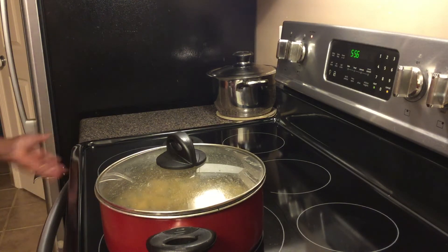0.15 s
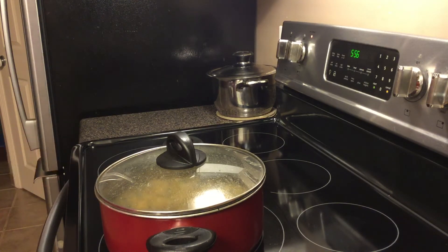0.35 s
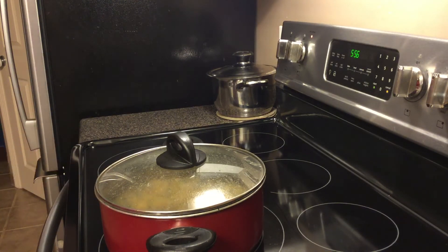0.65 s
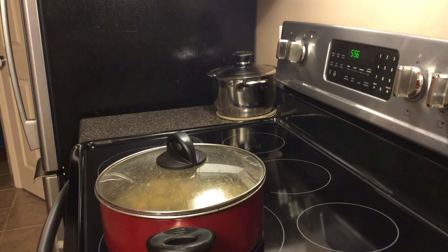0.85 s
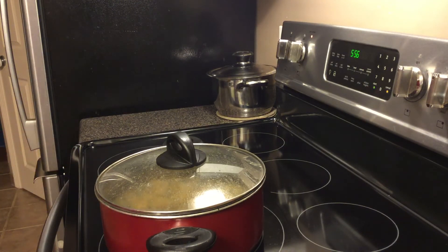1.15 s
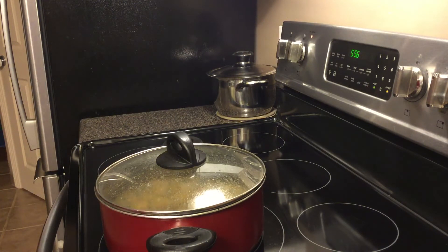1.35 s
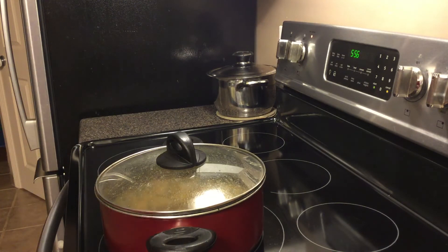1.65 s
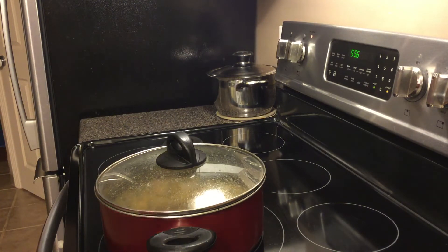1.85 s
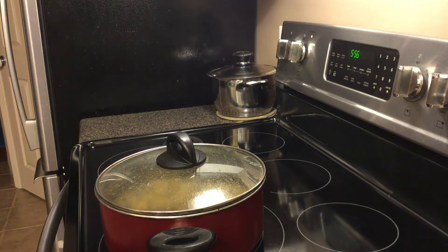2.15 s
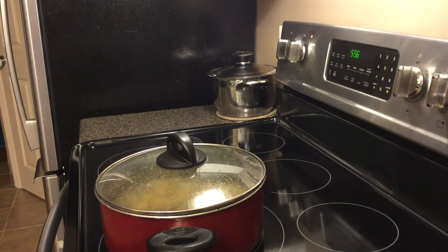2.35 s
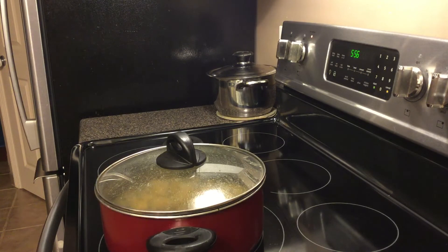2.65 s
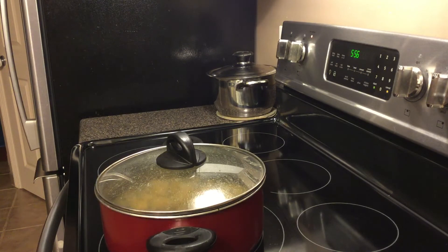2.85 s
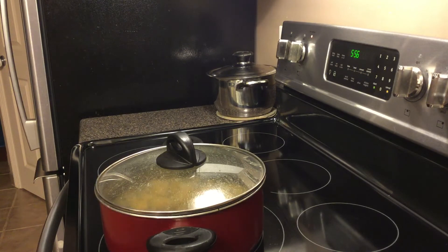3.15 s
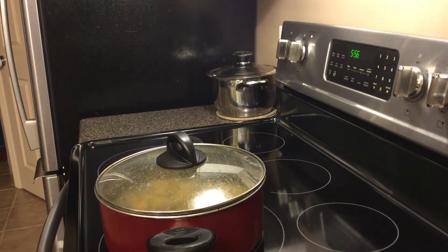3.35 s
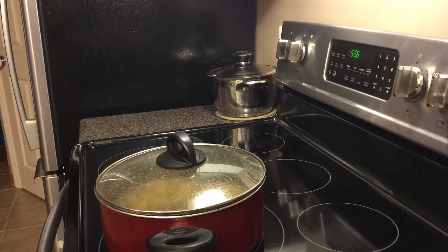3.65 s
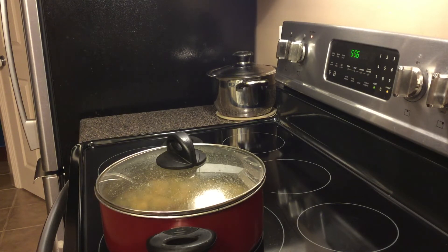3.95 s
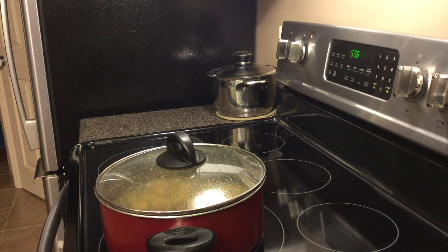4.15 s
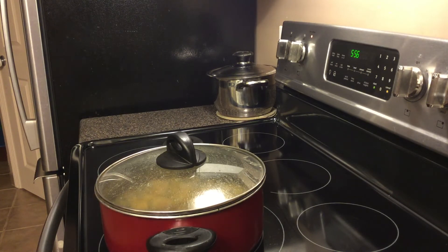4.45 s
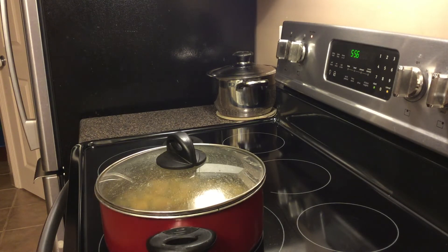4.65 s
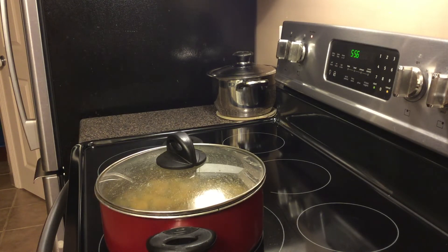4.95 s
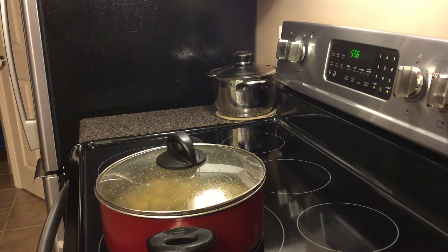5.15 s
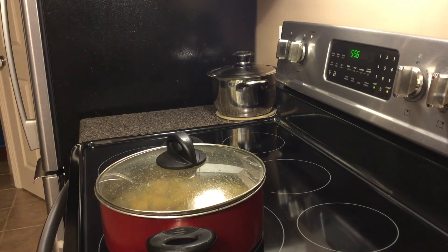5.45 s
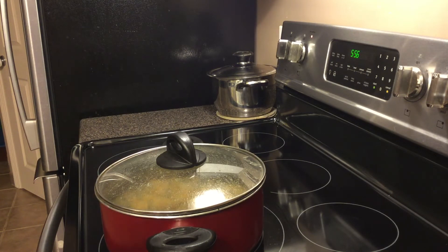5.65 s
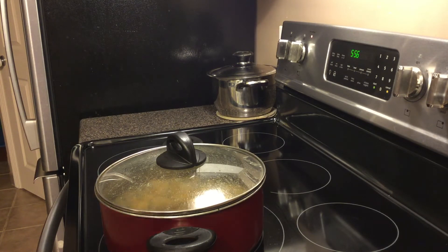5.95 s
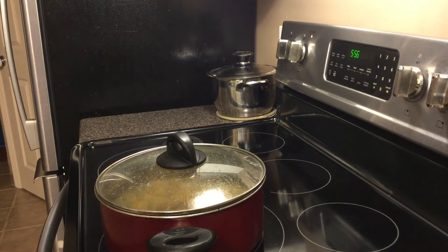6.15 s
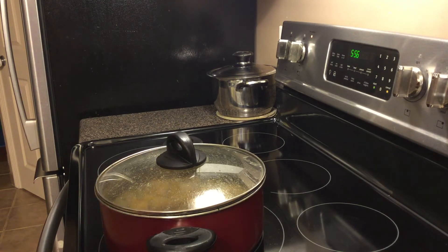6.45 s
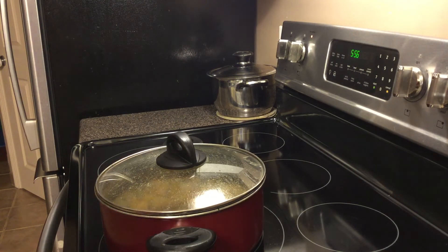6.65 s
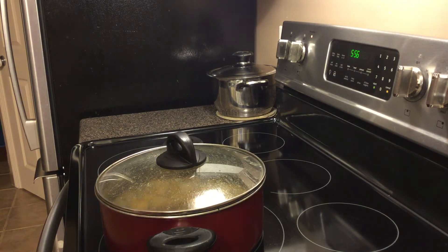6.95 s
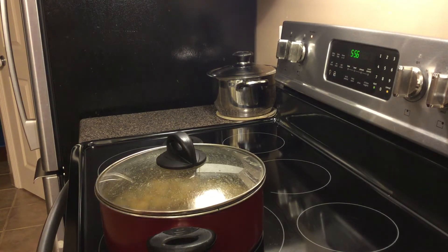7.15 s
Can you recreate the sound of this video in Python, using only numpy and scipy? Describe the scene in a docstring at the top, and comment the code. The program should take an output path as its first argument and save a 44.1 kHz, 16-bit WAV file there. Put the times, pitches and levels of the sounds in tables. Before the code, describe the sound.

In a small, hard-walled home kitchen, a lidded pot simmers with a low, lumpy drone and faint metallic pings. Metal rings weakly at first and soft steps thump the floor. Away from the pot, a drawer or cupboard slams loudly with a utensil rattle, then a duller knock, small bumps, a bright clack and light taps follow. One stationary microphone picks up low rumble and slight hiss.

```python
"""A quiet home kitchen: filtered noise makes a simmering pot's low lumpy drone, house rumble and room tone.
At the start metal rings faintly as wavering sines; soft footfalls, heard as damped sines, thump the floor.
Bubbles ping the pot wall as decaying sine pairs, among faint rubbing strokes and tiny noise ticks.
From about 2.5 s a drawer or cupboard clacks, slams and is knocked: spiky rattles excite wood and metal.
A small hard-walled room answers knocks, thuds and the listed pings with a decaying noise echo."""
import sys
import numpy as np
from scipy import signal
from scipy.fft import rfft, irfft, next_fast_len
from scipy.io import wavfile
from scipy.ndimage import uniform_filter1d, map_coordinates

SR = 44100
rng = np.random.default_rng(int(sys.argv[2]) if len(sys.argv) > 2 else 0)


def transcribe(u):
    """Save the signal u as a 16-bit wav file named by the first command-line argument.

    u: samples, shape (n,) or (channels, n), limited to [-1, 1]; the rate is SR.
    q: integer samples, one column per channel.
    """
    v = np.clip(np.atleast_2d(u).T, -1, 1)
    q = np.round(v * 32767).astype(np.int16)
    wavfile.write(sys.argv[1], SR, q)


N = 322371

# Metal still ringing at the start: pitch_hz, level_db, t60_s
LINGERING_MODES = [(1190, -70, .5), (1500, -73, .8), (1880, -74, 1.5), (2370, -72.5, 2), (4010, -71.5, .5)]
# Slow level changes of the steady sources: time_s, simmer_level_db, house_rumble_level_db
STEADY_LEVELS = [(0.0, -52, -63), (0.41, -56.5, -60), (0.81, -52, -63), (1.16, -55.5, -56),
                 (1.46, -56, -63.5), (1.73, -55, -64.5), (2.38, -56, -61), (2.69, -55, -61),
                 (2.87, -53.5, -54.5), (4.07, -55.5, -64), (4.95, -54.5, -54.5), (5.23, -54.5, -59.5),
                 (5.9, -52.5, -62), (6.4, -54.5, -59), (6.84, -55, -61.5), (7.31, -52, -67)]
# Relative spectrum of the building's rumble: frequency_hz, density_db_per_hz
RUMBLE_SPECTRUM = [(13, -55), (22, -38), (27, -34), (29, -38), (35, -60), (45, 11.5), (130, 2.5),
                   (170, -73), (290, -120)]
# Relative spectrum of room tone and microphone hiss: frequency_hz, density_db_per_hz
AIR_SPECTRUM = [(180, -43), (300, -4.5), (326, -15), (360, 2), (405, -18), (478, -2), (565, -14),
                (614, -11.5), (946, -16), (1150, -16), (2320, -26.5), (7320, -30.5), (9240, -27),
                (14200, -31.5), (16000, -47)]
# Relative spectrum of the simmering pot: frequency_hz, density_db_per_hz
SIMMER_SPECTRUM = [(65, -24.5), (110, -10), (140, -14), (161, -9.5), (188, -1.5), (232, -12.5),
                   (268, -14.5), (323, -27.5), (361, -32), (420, -26.5), (550, -61), (920, -120)]
# Modes of the pot wall: pitch_hz, relative_level_db (the level serves the small pings only)
POT_MODES = [(1170, 10), (1720, 5), (2110, 0), (2385, -1), (2840, 0), (3380, -3), (4000, -5)]
# Loudest pings of the pot wall: start_s, level_db, mode_index (from 0)
PINGS = [(.245, -68.5, 4), (.46, -71, 1), (.51, -63, 1), (.57, -73, 1), (.649, -66, 1), (.862, -72, 1),
         (1.02, -72, 2), (1.083, -73, 5), (1.285, -71, 4), (1.36, -66, 4), (1.485, -69, 4),
         (2.047, -60.5, 4), (3.533, -69, 2), (3.947, -65.5, 6), (4.25, -70, 1), (4.545, -69, 1),
         (4.585, -70, 1), (5.62, -61, 0), (5.708, -71, 4), (5.715, -61, 0), (5.797, -70, 3),
         (5.798, -62, 0), (5.885, -65, 0), (5.912, -71, 2), (5.972, -57, 0), (6.03, -71, 4),
         (6.033, -71, 5), (6.037, -70, 2), (6.314, -61, 1)]
# Low thuds through furniture and floor: start_s, level_db, pitch_hz, t60_s
THUDS = [(0, -38, 66, 0.37), (0.036, -37, 86, 0.14), (1.002, -40, 51.4, 0.29), (1.041, -36, 65, 0.1),
         (1.2, -45, 54.6, 0.53), (2.456, -28, 179, 0.063), (2.519, -23.5, 227.2, 0.2),
         (2.52, -17, 150.4, 0.12), (2.527, -17.5, 83.5, 0.089), (2.562, -28, 190.5, 0.11),
         (2.563, -24, 103.5, 0.1), (2.598, -30, 87, 0.062), (2.806, -37, 115, 0.067),
         (2.857, -40, 86, 0.19), (2.97, -53, 95.3, 0.078), (3.267, -25.5, 74, 0.11),
         (3.2799, -21, 84.5, 0.071), (3.282, -32.5, 140, 0.13), (3.3, -35.5, 123, 0.13),
         (3.355, -41.5, 99, .12), (4.214, -35.5, 100, 0.2), (4.453, -40.5, 180, 0.15),
         (4.741, -37.5, 101.6, 0.34), (4.77, -34.5, 92.3, 0.23), (4.95, -37, 231.4, 0.079),
         (5.138, -36, 290.5, 0.31), (5.144, -40, 515, 0.12), (5.543, -39, 171, 0.2), (5.58, -35.5, 96, 0.1),
         (5.741, -37.5, 108, 0.075), (6.157, -46, 379, 0.12)]
# Rubbing strokes, at full level from start_s: start_s, held_s, level_db
STROKES = [(0, 0.012, -56), (.1, 0.12, -71), (2.3, 0.1, -67.5), (5.26, 0.024, -66), (5.82, 0.11, -72.5),
           (6.65, 0.027, -71)]
# Relative spectrum of rubbing: frequency_hz, density_db_per_hz
RUBBING_SPECTRUM = [(180, -37), (300, 3), (500, -4), (900, -8), (2400, -13), (4000, -22.5), (9000, -47),
                    (14000, -83)]
# Tiny bright ticks: start_s, level_db (rms before decay)
TICKS = [(0.087, -73), (.388, -70.5), (0.857, -74), (4.96, -65.5), (7.168, -63)]
# Relative spectrum of a tick: frequency_hz, density_db_per_hz
TICK_SPECTRUM = [(5000, -48), (7000, -7), (8200, -18), (9600, -12), (11500, -18), (13500, -12),
                 (15500, -49)]
# Hard contacts: start_s, level_db, wood_db (re dense body), ring_db (re direct rattle), room_db (re rattle),
# steel_db (utensil modes re body), ring_hz, rattle_t60_s, edge_hz (hardness as top of the metal edge)
KNOCKS = [(2.4528, -26.5, -1, 4, -7.5, -2, 1276, 0.04, 12900),
          (2.461, -28, -11, -11, -15, -6, 1970, 0.065, 7000),
          (2.5094, -27.5, -28, -3.5, -4.5, -16, 1376, 0.084, 14200),
          (2.5185, -34.5, 11.5, 7.5, -7, -5, 542, 0.13, 15100),
          (2.5215, -36, -13, 0, -10, 0, 2090, 0.068, 9000), (2.533, -50, 10, -4, 1, -3, 3050, 0.055, 7950),
          (2.5523, -43, 17, 6, -13, 3, 1820, 0.054, 9500), (2.566, -38, 10.5, 2, -10, 1, 710, 0.042, 5000),
          (2.594, -47, 6, 3, -7, -5, 530, 0.076, 4000), (3.107, -61, -10, 2, -6, 3, 1070, 0.053, 2340),
          (3.257, -53.5, -7, -5, -2, -12, 2050, 0.067, 13600),
          (3.265, -43, 0, -6, -10, -1, 1065, 0.1, 5300), (4.2017, -51, 17, 5, -13.5, 6, 1170, 0.062, 1950),
          (4.7342, -42.5, 7, -5, -7, -4, 2550, 0.043, 5400),
          (4.739, -47, -4.5, 0.5, -14, -5, 1115, 0.086, 4400),
          (4.765, -50.5, 8, 0, -11, 6, 1100, 0.044, 3900), (4.941, -62, 1, 12.5, -10, -8, 507, 0.17, 1750),
          (5.123, -57, -5, -3, -4, -6, 2530, 0.051, 4000),
          (5.1321, -27.5, -23, -9, -6, -3, 3180, 0.054, 5530),
          (5.141, -42.5, -17, -0.5, -13, -8, 908, 0.43, 5600),
          (5.139, -47.5, 7.5, 4.5, -8.5, 5, 523, 0.22, 3060),
          (5.152, -40, -5, 3.5, -19, -2, 2620, 0.066, 5500), (5.176, -48, -1, -6, -4, 2, 2120, 0.052, 6000),
          (5.2509, -65, -6, 4, -12, -1, 908, 0.54, 5070),
          (5.534, -59.5, 13.5, 4, -2, -20, 1270, 0.095, 5100),
          (5.551, -62, 13, -7, -7.5, -11, 2150, 0.096, 6000),
          (5.801, -76, 15, 12, -11, -5, 650, 0.16, 3800),
          (6.1566, -55.5, 13.5, 7, -6, 2, 1180, 0.071, 7800),
          (6.176, -58, 9, 7.5, -8, -11, 1525, 0.069, 4930), (6.243, -68, 7, 6, 0, -5, 1110, 0.076, 3500)]
# Modes of the drawer panels: pitch_hz, width_hz, level_db
PANEL_MODES = [(266, 60, 7), (429, 122, 2.5), (556, 75, 2.5), (700, 82, 2.5), (903, 57, -4),
               (1130, 29, 5.5), (1270, 850, -7.5)]
# Modes of the utensils before scatter and damping: pitch_hz, width_hz, level_db
UTENSIL_MODES = [(1524, 14, 9), (1900, 20, 6), (2116, 30, 8), (2300, 30, 3), (2660, 30, 6), (2880, 30, 5),
                 (3100, 30, 3), (3750, 70, 4), (4210, 90, -3), (4990, 110, 2), (5800, 150, 0),
                 (8400, 700, 5), (10680, 250, 1), (11940, 300, -4)]
# Decay of the kitchen's echo: frequency_hz, t60_s
KITCHEN_DECAY = [(80, 0.35), (300, 0.43), (1500, 0.48), (5000, 0.4), (9000, 0.35), (14000, 0.34)]

TOP_HZ = 15750  # band limit
SWELL_S, DAMPED_S = .05, .2  # time constant of the lingering ring's rise; time its damping starts
AIR_DB = -68.5
PING_T60_S, PING_ROOM_DB = 0.12, -12
SLIDE_RISE_DB_PER_S, SLIDE_FALL_DB_PER_S = 359, 167
HARDEST_HZ, BODY_TOP_HZ, BODY_KNEE_HZ = 14000, 4070, 5340  # a softer contact also dulls the body
EDGE_DB, EDGE_DB_PER_OCTAVE = -6.5, 5  # edge at HARDEST_HZ; loss for each octave softer
HARD_ATTACK_S = 0.00079  # rise time constant at HARDEST_HZ, longer when softer
RING_LIFE, RING_ROOM_DB = 0.48, -10.5  # ring t60 over rattle t60; the room's answer to the ring
LEAD_DB, LEAD_DB_PER_S = -23.5, 1500  # a faint scrape swells into each contact
BODY_BOTTOM = 0.28  # low edge of the body over the ring pitch
GRIP = 0.89  # loose pieces damp each other: added mode width times rattle t60
SPILL_DB = -19  # faint treble that even a soft contact keeps
PATCH_DB = 2  # depth of the uneven patches in the room's answer


def amp(db):
    """Decibel law: gain of a level in dB."""
    return 10 ** (np.asarray(db) / 20)


def unit(x):
    """Power normalization: x at rms 1."""
    return x / np.sqrt(np.mean(x ** 2) + 1e-20)


def along(points, hz):
    """Interpolation of (Hz, value) points on a logarithmic frequency axis."""
    f, v = np.transpose(points)
    return np.interp(np.log(hz + 1), np.log(f + 1), v)


def curve(rows, axis=1):
    """Linear interpolation of a level column at each sample; -120 dB outside the rows."""
    rows = np.asarray(rows)
    return np.interp(np.arange(N) / SR, rows[:, 0], rows[:, axis], left=-120, right=-120)


def wobble(rate):
    """Random modulation: a smooth curve through rate knots a second, at most 60."""
    knots = rng.standard_normal(int(N * 60 / SR) + 4)
    return map_coordinates(knots, [np.arange(N) * min(rate, 60) / SR])


def filtered(x, response):
    """Linear filtering: the spectrum of x times a complex response of frequency."""
    m = next_fast_len(x.shape[-1] + SR // 2)
    return irfft(rfft(x, m) * response(np.fft.rfftfreq(m, 1 / SR)), m)[..., :x.shape[-1]]


def noise(spectrum, size=N):
    """Spectral shaping: white noise given a colour and rms 1."""
    return unit(filtered(rng.standard_normal(size), lambda hz: amp(along(spectrum, hz))))


def resonances(modes):
    """Modal superposition: causal response of (Hz, width, dB) modes with alternating signs."""
    def response(f):
        total = 0
        for k, (center, width, db) in enumerate(modes):
            damping = 1j * f * width
            total = total + (-1) ** k * amp(db) * damping / (center * center - f * f + damping)
        return total
    return response


def below(top_hz):
    """Low-pass law of contact: a causal steep filter, since a softer contact has less treble."""
    return lambda f: signal.freqs(*signal.butter(7, 1, analog=True), f / top_hz)[1]


def above(f, hz):
    """Second-order causal high-pass response."""
    return (1j * f / (1j * f + hz)) ** 2


def even(response):
    """Power normalization of a sampled response over frequency."""
    return response / np.sqrt(np.mean(np.abs(response) ** 2))


def add(track, s, x):
    """Superposition: mix x into track from s seconds on."""
    part = track[round(s * SR):][:len(x)]
    part += x[:len(part)]


def echo():
    """Reverberation: a fresh noise tail of energy 1, each frequency dying at its own speed."""
    hz, t, z = signal.stft(rng.standard_normal(SR // 2), SR, nperseg=256)
    patches = uniform_filter1d(rng.standard_normal(z.shape), size=3, axis=0)
    patches = unit(uniform_filter1d(patches, size=6, axis=1))
    decay_db = -60 * t / along(KITCHEN_DECAY, hz)[:, None]
    tail = signal.istft(z * amp(PATCH_DB * patches + decay_db), SR, nperseg=256)[1][:SR // 2]
    # The walls answer one after another, so the tail builds up.
    tail = tail * (1 - np.exp(-(np.arange(SR // 2) / SR / 0.012) ** 2))
    return tail / np.linalg.norm(tail)


def linger():
    """Free modal decay: metal rings faintly, each mode wavering, until it is damped."""
    t = np.arange(N) / SR
    free = amp(-180 * np.maximum(t - DAMPED_S, 0)) * (1 - np.exp(-t / SWELL_S))
    out = np.zeros(N)
    for hz, db, t60 in LINGERING_MODES:
        level_db = db - 60 * t / t60 + 4.5 * wobble(25)
        phase = 2 * np.pi * hz * t + 1.6 * wobble(50)  # phase wander in radians
        out += amp(level_db) * np.sin(phase)
    return free * out


def house():
    """Stationary background noise: modulated low rumble of the building and nearly steady room tone."""
    rumble = amp(curve(STEADY_LEVELS, axis=2) + 0.55 * wobble(5.4)) * noise(RUMBLE_SPECTRUM)
    return rumble + amp(AIR_DB + 0.085 * wobble(4.5)) * noise(AIR_SPECTRUM)


def wall_ping(hz, t60):
    """Beating of a split wall mode: two close sines decay together after a soft rise."""
    t = np.arange(SR // 2) / SR
    twin_hz = hz * rng.normal(1, .02)
    pair = np.sin(2 * np.pi * hz * t) + .4 * np.sin(2 * np.pi * twin_hz * t)
    return pair * amp(-60 * t / t60) * (1 - np.exp(-t / .006))


def pot():
    """Bubble excitation: collapsing bubbles pulse the pot's low drone and tap its wall modes."""
    drone_db = curve(STEADY_LEVELS) + 1.8 * wobble(12) + .8 * wobble(4)
    out = amp(drone_db) * noise(SIMMER_SPECTRUM)
    for s, db, mode in PINGS:
        tap = amp(db) * wall_ping(POT_MODES[mode][0] * rng.normal(1, .006), PING_T60_S)
        add(out, s, tap + amp(PING_ROOM_DB) * signal.fftconvolve(tap, echo())[:len(tap)])
    # Many fainter pings fall at random times, without echo.
    for when, which, size, detune in rng.random((300, 4)):
        hz, db = POT_MODES[int(which * len(POT_MODES))]
        add(out, when * N / SR, amp(db - 84 + 6 * size) * wall_ping(hz * (.985 + .03 * detune), .1))
    return out


def thuds():
    """Damped oscillation: a soft heavy contact swings low, with a faster-dying partner above it."""
    out, t = np.zeros(N), np.arange(SR // 3) / SR
    for s, db, hz, t60 in THUDS:
        partner = 0.24 * np.sin(2 * np.pi * 1.673 * hz * t) * amp(-30 * t / t60)
        swing = np.sin(2 * np.pi * hz * t) + partner
        onset = 1 - np.exp(-(t * hz / 0.2) ** 2)  # sets in over a fraction of a cycle
        direct = amp(db - 60 * t / t60) * onset * swing
        add(out, s, direct)
        add(out, s, amp(-10.0) * signal.fftconvolve(direct, echo()))
    return out


def slides():
    """Friction noise: wood and metal rub grainily in strokes that swell, hold and die away."""
    t = np.arange(N) / SR
    strokes = np.zeros(N)
    for s, held, db in STROKES:
        rise_db = SLIDE_RISE_DB_PER_S * np.minimum(t - s, 0)
        fall_db = SLIDE_FALL_DB_PER_S * np.maximum(t - s - held, 0)
        strokes += amp(db + rise_db - fall_db)
    return strokes * amp(0.89 * wobble(55)) * noise(RUBBING_SPECTRUM)


def ticks():
    """Impulsive noise: tiny bright clicks decay exponentially."""
    out, t = np.zeros(N), np.arange(SR // 20) / SR
    for s, db in TICKS:
        add(out, s, amp(db - 60 * t / 0.077) * noise(TICK_SPECTRUM, size=len(t)))
    return out


def struck_body(wood_db, steel_db, ring_hz, t60, edge_hz):
    """Source-filter principle: response of dense body, wood panels and metal edge to a contact."""
    top_hz = BODY_TOP_HZ * np.tanh(edge_hz / BODY_KNEE_HZ)
    edge_db = EDGE_DB + EDGE_DB_PER_OCTAVE * np.log2(edge_hz / HARDEST_HZ)
    # Other pieces are struck each time, so pitches and levels scatter.
    steel = [resonances([(hz * rng.normal(1, .004), width + GRIP / t60, level + rng.normal(0, 2.5))])
             for hz, width, level in UTENSIL_MODES]

    def response(f):
        metal = 1 + amp(steel_db) * sum(mode(f) for mode in steel)
        dull = below(top_hz)(f)
        dense = above(f, BODY_BOTTOM * ring_hz) / (1j * f + 1800) * metal * dull
        wood = resonances(PANEL_MODES)(f) * dull
        edge = above(f, 1250) / (1j * f + 5000) * metal * (below(edge_hz)(f) + amp(SPILL_DB))
        return even(dense) + amp(wood_db) * even(wood) + amp(edge_db) * even(edge)
    return response


def struck_ring(ring_hz, t60):
    """Damped oscillation: the struck spot's own clack, with the room's answer, at energy 1."""
    t = np.arange(SR // 2) / SR
    # Phase wander in radians: the piece keeps touching its neighbours.
    chatter = .04 * np.cumsum(rng.standard_normal(len(t)))
    ring = np.sin(2 * np.pi * ring_hz * t + chatter)
    ring = ring * amp(-60 * t / t60 / RING_LIFE) * (1 - np.exp(-t / 0.0018))
    ring = ring + amp(RING_ROOM_DB) * signal.fftconvolve(ring, echo())[:len(t)]
    return ring / np.linalg.norm(ring)


def knocks():
    """Impact excitation: a short spiky rattle rings the panels, the struck spot and the metal."""
    out, t = np.zeros(N), np.arange(SR // 2) / SR
    knots = t[::SR // 110]
    before = t[:SR // 40][::-1]  # seconds left until contact
    for s, db, wood_db, ring_db, room_db, steel_db, ring_hz, t60, edge_hz in KNOCKS:
        attack_s = HARD_ATTACK_S * HARDEST_HZ / edge_hz
        fade = amp(-60 * t / t60) * (1 - np.exp(-t / attack_s))
        spikes = rng.standard_normal(len(t)) * amp(5.0 * rng.standard_normal(len(t)))
        rattle = spikes * fade
        # Loose contents settle unevenly.
        jostle = amp(0.84 * np.interp(t, knots, rng.standard_normal(len(knots))))
        blow = rattle / np.linalg.norm(rattle) + amp(room_db) * echo() * jostle
        body = struck_body(wood_db, steel_db, ring_hz, t60, edge_hz)
        clack = filtered(blow, body) + amp(ring_db) * struck_ring(ring_hz, t60)
        add(out, s, amp(db) * np.linalg.norm(fade) * clack)
        scrape = amp(db + LEAD_DB - LEAD_DB_PER_S * before) * rng.standard_normal(len(before))
        add(out, s - before[0], filtered(scrape, body))
    return out


def scene():
    """Superposition: all sources sum at one microphone."""
    return (linger() + house() + pot() + thuds() + slides() + ticks() + knocks())[None]


def record(dry):
    """Band limiting: the microphone rolls off the deepest bass; nothing is kept above TOP_HZ."""
    bass_cut = lambda hz: (1j * hz / (1j * hz + 42)) ** 3
    return filtered(dry, lambda hz: bass_cut(hz) * (hz < TOP_HZ))


dry = scene()
out = record(dry)
transcribe(out)
```